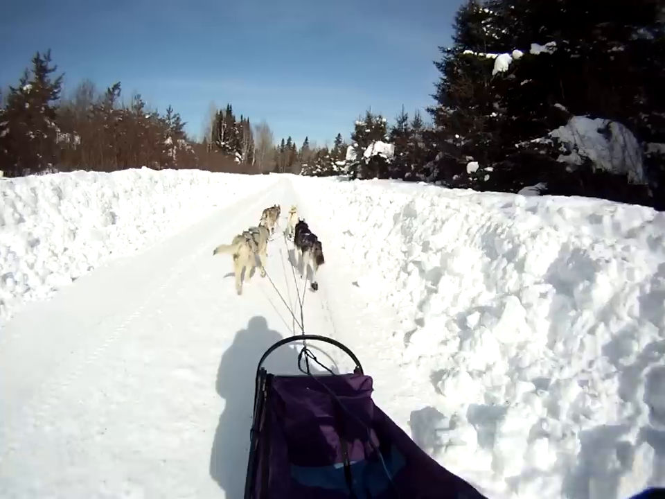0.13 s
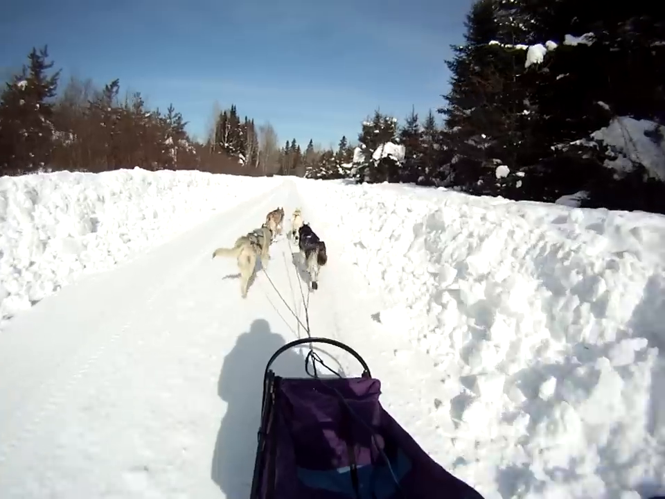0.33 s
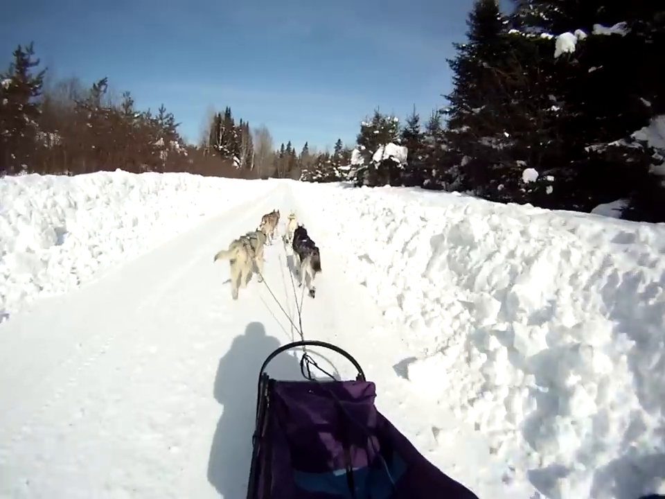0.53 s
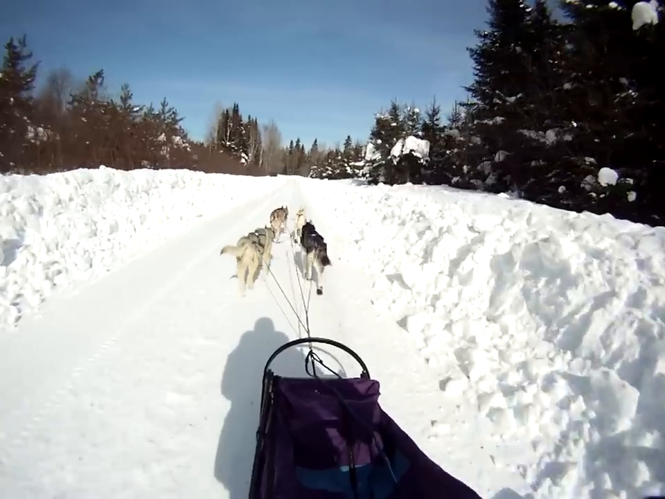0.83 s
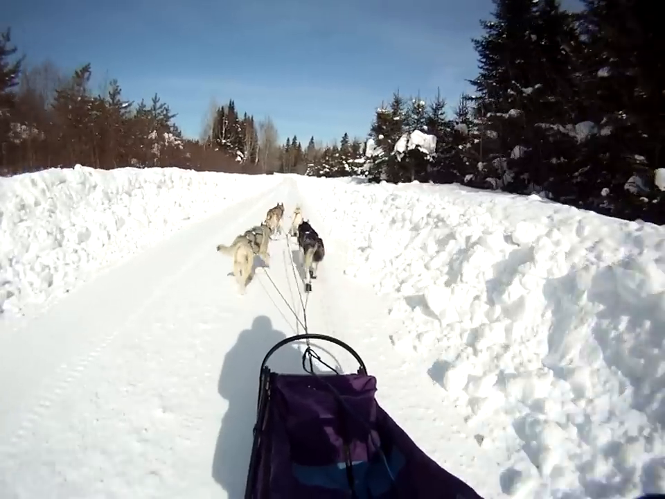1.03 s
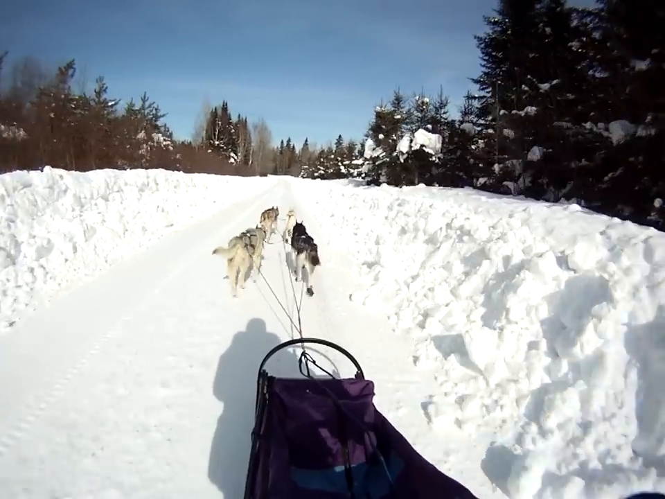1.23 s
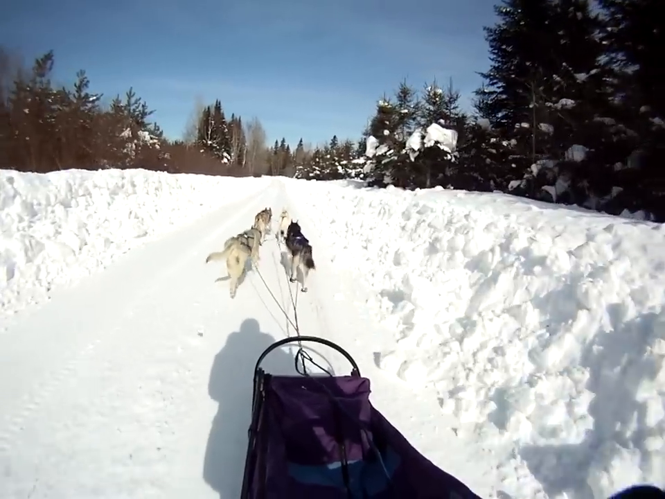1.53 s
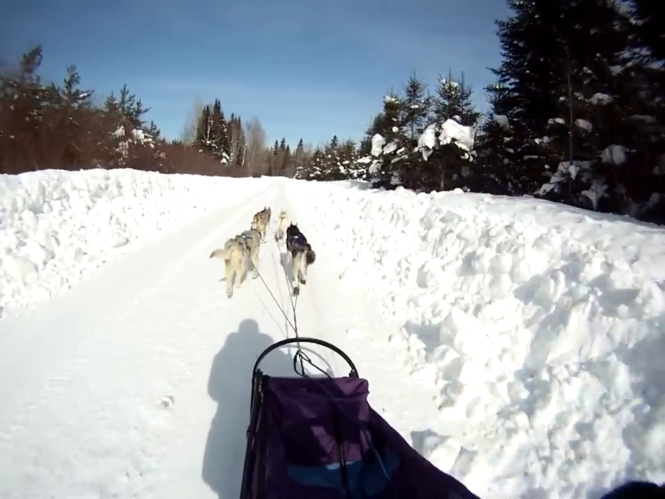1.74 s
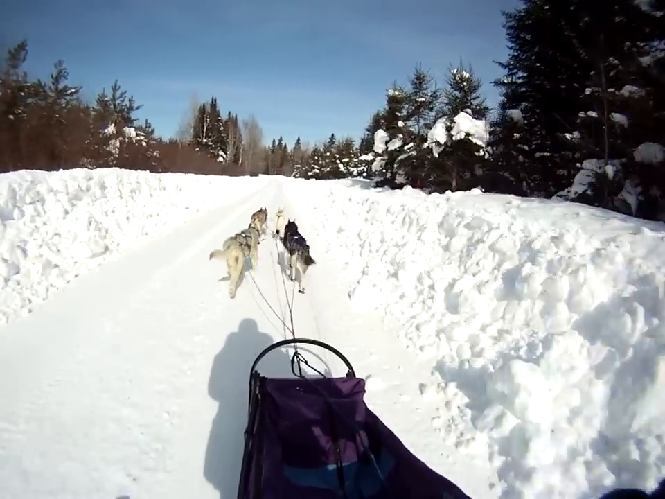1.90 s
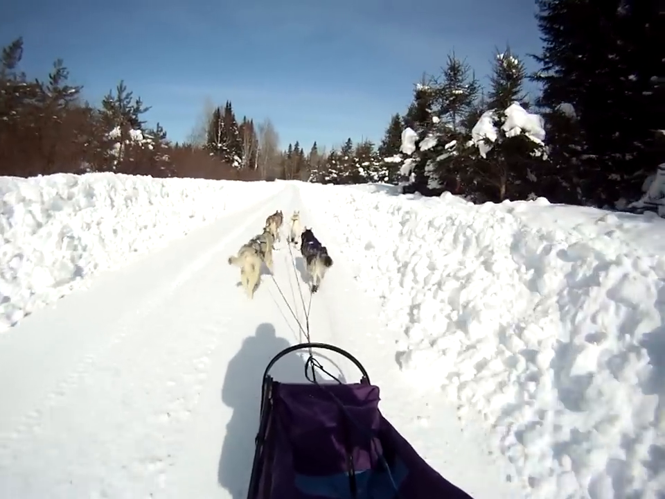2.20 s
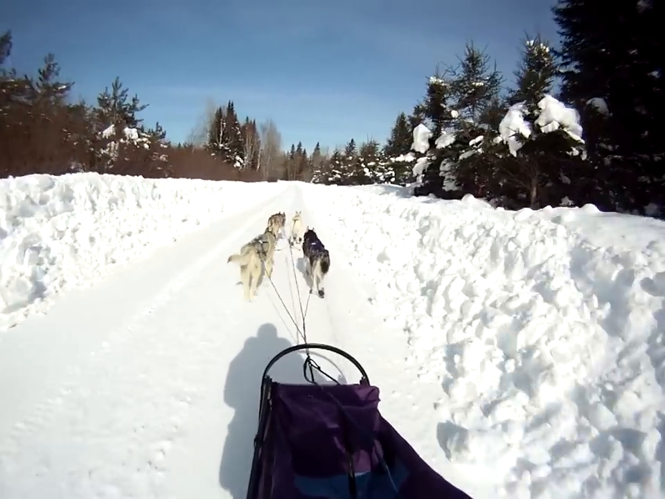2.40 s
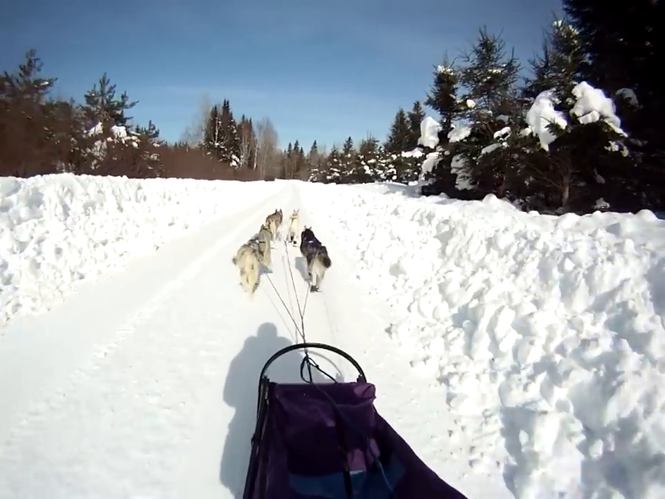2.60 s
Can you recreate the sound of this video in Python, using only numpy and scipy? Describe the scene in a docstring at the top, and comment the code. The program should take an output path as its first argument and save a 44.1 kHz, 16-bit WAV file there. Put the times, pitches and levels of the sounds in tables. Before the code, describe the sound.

Continuous grainy hiss of a dog sled gliding on crusty snow, with low thuds and deep wind puffs.

```python
"""Dog sled on a packed trail

The driver hears the runners crush snow grains without pause: random clicks and hiss ring in a set of resonances.
Bites into crusty patches are short bursts of the same ringing snow, and stick-slip squeaks are wavering tones.
Bumps thud as low swings over a steady rumble, and wind buffets the microphone as swelling deep noise.
The coarse sample-and-hold of a small camera mirrors the sound into the treble as a glassy fizz."""
import sys
import numpy as np
from scipy import signal
from scipy.fft import rfft, irfft, next_fast_len
from scipy.io import wavfile
from scipy.ndimage import map_coordinates

SR = 44100
rng = np.random.default_rng(int(sys.argv[2]) if len(sys.argv) > 2 else 0)


def digitize_waveform(pressure):
    """Quantize a signal to 16-bit integers and store it at the path in sys.argv[1].

    Rows of a 2-D input are taken as channels; values are limited to [-1, 1].
    """
    field = np.atleast_2d(pressure).T
    bounded = np.clip(field, -1, 1)
    quanta = np.round(bounded * 32767).astype(np.int16)
    wavfile.write(sys.argv[1], SR, quanta)


N = 121275  # length in samples

# Loudness of the steady glide. Each row: time in seconds, level in dB before GLIDE_TRIM_DB.
GLIDE_LEVEL = [(.05, -44.5), (.12, -46), (.24, -44.5), (.34, -45), (.44, -45.5), (.57, -45), (.74, -46),
               (.85, -46.5), (1.06, -45), (1.29, -46.5), (1.36, -45), (1.53, -46.5), (1.6, -45.5),
               (1.89, -45), (2.08, -44), (2.29, -46), (2.39, -43.5), (2.55, -47.5), (2.64, -44),
               (2.75, -46.5)]
# Runner pressure; the knot rates set how fast the random surges and chatter move.
GLIDE_TRIM_DB = 0.54
SURGE_DB, SURGE_KNOTS_PER_S = 0.56, 74.5
CHATTER_DB, CHATTER_KNOTS_PER_S = 1.49, 190.1
# Breaking grains, and the powder hiss relative to them.
GRAINS_PER_S, GRAIN_SPREAD_DB, POWDER_DB = 2200, 4, -1.5
# The low and high halves of the glide swell separately, so it drifts between duller and brighter.
DRIFT_DB, DRIFT_KNOTS_PER_S, DRIFT_SPLIT_HZ = 0.5, 45.18, 2600

# Resonances that the scraping excites.
# Each row: frequency in Hz, width at half power in Hz, relative level in dB.
RESONANCES = [(580, 147, -13.5), (923, 170, -14.5), (1233, 138, -4.5), (1324, 110, -3.5), (1560, 67, -17),
              (1890, 108, -2.5), (2035, 110, 0.5), (2236, 88, -10), (2517, 106, -2), (2637, 82, -3.5),
              (2925, 95, -11), (3100, 83, -10), (3487, 89, -2), (3740, 120, -12), (3925, 130, -15.5),
              (4740, 230, -15), (5370, 150, -17)]
# Broad rush of the snow under the resonances. Each row: frequency in Hz, relative level in dB per Hz.
SNOW_RUSH = [(60, -22), (250, -13.5), (500, -14.5), (780, -21.5), (1500, -13.5), (3000, -14), (4200, -17),
             (5000, -20), (5900, -28)]

# The runners bite into crust; icier patches sound higher.
# Each row: start in seconds, time until release in seconds, centre in Hz, level in dB before BITE_TRIM_DB.
CRUST_BITES = [(0.143, 0.017, 3500, -43), (0.227, 0.014, 3900, -46), (0.274, 0.0081, 3550, -41.5),
               (0.296, 0.0046, 2300, -36), (0.37, .014, 2900, -40), (.380, 0.0065, 3030, -35.5),
               (.409, 0.011, 1500, -37.5), (0.421, 0.015, 3400, -38.5), (0.455, 0.0068, 3020, -40),
               (0.512, 0.0034, 2300, -48), (0.524, 0.017, 3560, -42), (0.702, 0.021, 3300, -44.5),
               (0.787, 0.016, 1970, -43.5), (0.941, 0.032, 4350, -45), (1.012, 0.0044, 2100, -56),
               (1.066, 0.016, 2320, -43), (1.32, 0.0088, 2140, -38), (1.333, 0.0073, 2100, -38),
               (1.341, 0.016, 3300, -39), (1.42, 0.014, 1960, -40), (1.562, 0.013, 2980, -44),
               (1.587, 0.011, 2070, -39.5), (1.623, 0.032, 2770, -43.5), (1.731, 0.017, 2220, -49),
               (1.795, 0.014, 2530, -45), (1.93, .01, 2250, -38), (1.971, 0.0078, 2370, -36),
               (1.991, 0.0075, 2000, -37.5), (2.064, 0.017, 3480, -38.5), (2.105, 0.0029, 3250, -42),
               (2.205, .008, 5360, -42), (2.3794, 0.0042, 2570, -37), (2.446, .01, 3500, -40),
               (2.465, 0.0052, 2660, -41.5), (2.514, 0.0076, 5000, -45), (2.615, 0.016, 3800, -39.5),
               (2.664, 0.0066, 2180, -39)]
BITE_TRIM_DB, BITE_Q = -3, 1.04
# Attack and release, shared by bites and squeaks.
BITE_ATTACK_S, BITE_RELEASE_S = 0.00087, 0.0029

# The snow sticks and slips in a short squeak.
# Each row: start in seconds, time until release in seconds, mean pitch in Hz, level in dB.
STICK_SLIPS = [(.3645, .005, 2450, -38), (1.3795, .006, 2020, -37), (2.379, .003, 2450, -35),
               (2.406, .01, 2000, -37)]
SQUEAK_WAVER, SQUEAK_WAVER_KNOTS_PER_S = 0.0485, 700  # waver as a fraction of pitch

# Bumps thud through the sled.
# Each row: start in seconds, mean pitch in Hz, level in dB before THUD_TRIM_DB.
BUMPS = [(0.206, 250, -48.5), (0.373, 260, -48.5), (0.429, 129, -51), (.575, 185, -52), (.63, 90, -55),
         (.705, 167, -51.5), (0.781, 170, -51.5), (1.345, 240, -50), (1.39, 119.6, -55.5),
         (1.415, 240, -54), (1.557, 190, -47), (1.64, 91.4, -52), (1.761, 131, -52.5), (1.936, 199.4, -49),
         (2.02, 99.3, -53), (2.21, 85, -63), (2.335, 84, -50), (2.40, 101.6, -56), (2.455, 98, -52.5),
         (2.597, 190, -53), (2.655, 130, -55)]
THUD_ATTACK_S, THUD_HOLD_S, THUD_RELEASE_S = 0.006, 0.015, 0.02  # hold counts from the start
THUD_WAVER, THUD_WAVER_KNOTS_PER_S, THUD_TRIM_DB = 0.217, 168.4, -2  # waver as a fraction of pitch
# Steady rumble of the sled. Each row: frequency in Hz, relative level in dB per Hz.
RUMBLE_COLOUR = [(20, -10), (70, 8), (130, 2), (250, -2.5), (400, -8.5), (600, -2.5), (900, -11),
                 (3000, -26)]
RUMBLE_DB = -58

# Gusts on the microphone.
# Each row: peak time in seconds, half length (standard deviation) in seconds, level in dB before GUST_TRIM_DB.
WIND_GUSTS = [(0.087, 0.03, -41), (0.469, 0.047, -39.5), (0.68, 0.041, -39), (0.79, 0.018, -49.5),
              (1.067, 0.055, -42), (1.244, 0.04, -47), (1.494, 0.021, -43), (1.605, 0.015, -41),
              (1.707, 0.028, -43), (1.997, 0.036, -43.5), (2.432, 0.021, -41), (2.658, 0.022, -42)]
GUST_TRIM_DB, BREEZE_DB = -1, -54
# Deep tone of the wind. Each row: frequency in Hz, relative level in dB per Hz.
WIND_SPECTRUM = [(5, -37), (14, -13), (22, 12), (34, -12), (48, -6), (70, -13), (120, -31.5), (300, -31),
                 (1000, -59)]

# Camera: silence before the sound starts, fade-in length, coarse sampling rate and treble limit.
START_S, FADE_S = 0.036, 0.02
HOLD_HZ, TOP_HZ = 12000, 15400


def amp(db):
    """Turn decibels into linear gain."""
    return 10 ** (np.asarray(db) / 20)


def unit(x):
    """Scale a signal to rms 1."""
    return x / np.sqrt(np.mean(x ** 2) + 1e-20)


def clock():
    """Time of each sample in seconds."""
    return np.arange(N) / SR


def curve(rows):
    """Join rows of time and value with straight lines, one value per sample."""
    return np.interp(clock(), *np.transpose(rows))


def colour(points, hz):
    """Read gain from points of frequency and dB, joined on a log frequency axis."""
    point_hz, db = np.transpose(points)
    return amp(np.interp(np.log(hz + 1), np.log(point_hz + 1), db))


def wobble(knots_per_s):
    """Draw a smooth curve through random knots."""
    knots = rng.standard_normal(N)
    return map_coordinates(knots, [clock() * knots_per_s], mode="wrap")


def filtered(x, response):
    """Shape a sound by a gain that depends on frequency."""
    size = next_fast_len(N + SR // 2)  # padded with silence
    hz = np.fft.rfftfreq(size, 1 / SR)
    return irfft(rfft(x, size) * response(hz), size)[:N]


def noise(points):
    """Make coloured noise of rms 1."""
    white = rng.standard_normal(N)
    return unit(filtered(white, lambda hz: colour(points, hz)))


def burst(start, attack, hold, release):
    """Envelope with a straight rise and, once hold has passed since the start, an exponential fall."""
    t = clock() - start
    rise = np.clip(t / attack, 0, 1)
    return rise * np.exp(-np.maximum(t - hold, 0) / release)


def swing(hz, cycles):
    """Sine of rms 1 whose phase follows a wavering count of cycles per Hz."""
    return np.sqrt(2) * np.sin(2 * np.pi * hz * cycles)


def crunch():
    """Snow grains of uneven size break at random over a fine powder hiss."""
    breaks = rng.random(N) < GRAINS_PER_S / SR
    sizes = amp(GRAIN_SPREAD_DB * np.clip(rng.standard_normal(N), -2, 2))
    signs = np.sign(rng.standard_normal(N))
    powder = amp(POWDER_DB) * rng.standard_normal(N)
    return unit(unit(breaks * sizes * signs) + powder)


def body(x, size=4096):
    """Ring the resonances over the broad rush, causally, keeping the power of white noise."""
    hz = np.fft.rfftfreq(size, 1 / SR)
    power = colour(SNOW_RUSH, hz) ** 2
    for centre, width, db in RESONANCES:
        offset = (hz - centre) / (0.77 * width)
        power = power + amp(db) ** 2 / (1 + offset ** 2) ** 2
    # Folding the cepstrum gives minimum phase: the ringing only follows its excitation.
    cepstrum = irfft(np.log(power) / 2)
    fold = 1 + np.sign(np.fft.fftfreq(size))
    ring = irfft(np.exp(rfft(cepstrum * fold)))
    return signal.fftconvolve(x, ring / np.linalg.norm(ring))[:N]


def runners():
    """Chattering pressure on the crushed snow rings in the resonances, its tone drifting."""
    surge = SURGE_DB * wobble(SURGE_KNOTS_PER_S)
    chatter = CHATTER_DB * wobble(CHATTER_KNOTS_PER_S)
    pressure = amp(curve(GLIDE_LEVEL) + GLIDE_TRIM_DB + surge + chatter)
    glide = body(pressure * crunch())
    dull = filtered(glide, lambda hz: hz < DRIFT_SPLIT_HZ)
    bright = glide - dull
    dull_swell = amp(DRIFT_DB * wobble(DRIFT_KNOTS_PER_S))
    bright_swell = amp(DRIFT_DB * wobble(DRIFT_KNOTS_PER_S))
    return dull * dull_swell + bright * bright_swell


def band(x, hz, q):
    """Pass a sound twice through one broad resonance and set it to rms 1."""
    b, a = signal.iirpeak(hz, q, fs=SR)
    once = signal.lfilter(b, a, x)
    return unit(signal.lfilter(b, a, once))


def scrapes():
    """Each bite into crust brings out the ringing snow near its own centre."""
    ringing = body(crunch())
    total = np.zeros(N)
    for start, hold, hz, db in CRUST_BITES:
        bite = burst(start, BITE_ATTACK_S, hold, BITE_RELEASE_S)
        total += amp(db + BITE_TRIM_DB) * bite * band(ringing, hz, BITE_Q)
    return total


def squeaks():
    """Stick-slip sings one wavering pitch for a few milliseconds."""
    cycles = np.cumsum(1 + SQUEAK_WAVER * wobble(SQUEAK_WAVER_KNOTS_PER_S)) / SR
    total = np.zeros(N)
    for start, hold, hz, db in STICK_SLIPS:
        slip = burst(start, BITE_ATTACK_S, hold, BITE_RELEASE_S)
        total += amp(db) * slip * swing(hz, cycles)
    return total


def sled():
    """Each bump sets off a few uneven low swings, over a steady rumble."""
    cycles = np.cumsum(1 + THUD_WAVER * wobble(THUD_WAVER_KNOTS_PER_S)) / SR
    thuds = np.zeros(N)
    for start, hz, db in BUMPS:
        bump = burst(start, THUD_ATTACK_S, THUD_HOLD_S, THUD_RELEASE_S)
        thuds += amp(db + THUD_TRIM_DB) * bump * swing(hz, cycles)
    return thuds + amp(RUMBLE_DB) * noise(RUMBLE_COLOUR)


def wind():
    """Gusts swell and fade as deep puffs of noise over a light breeze."""
    gusts = np.zeros(N)
    for peak, half, db in WIND_GUSTS:
        gusts += amp(db + GUST_TRIM_DB) * np.exp(-0.5 * ((clock() - peak) / half) ** 2)
    strength = np.hypot(gusts, amp(BREEZE_DB))  # powers add
    return strength * noise(WIND_SPECTRUM)


def scene():
    """Mix all sources at the microphone, in open air without echo."""
    mix = runners() + scrapes() + squeaks() + sled() + wind()
    return mix[None]


def record(dry):
    """The camera starts up and holds each coarse sample, which mirrors the sound into the treble."""
    fade_in = np.clip((clock() - START_S) / FADE_S, 0, 1)
    limited = filtered(dry[0], lambda hz: hz < HOLD_HZ / 2) * fade_in
    # The cosine adds the mirror images around the coarse rate; the sinc is the dulling of the hold.
    sampled = limited * (1 + 2 * np.cos(2 * np.pi * HOLD_HZ * clock()))
    return filtered(sampled, lambda hz: np.sinc(hz / HOLD_HZ) * (hz < TOP_HZ))[None]


dry = scene()
out = record(dry)
digitize_waveform(out)
```